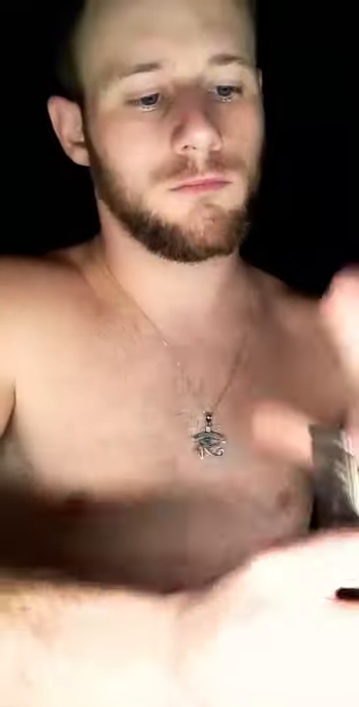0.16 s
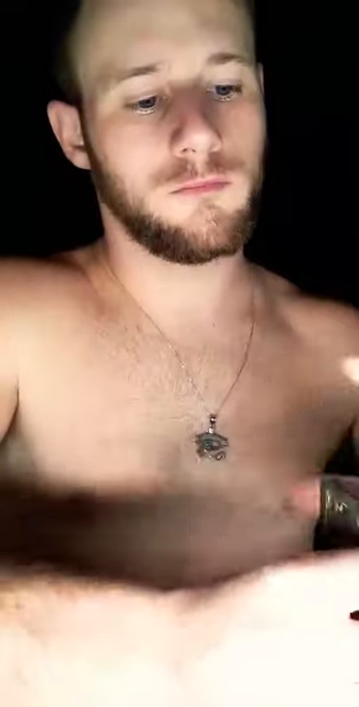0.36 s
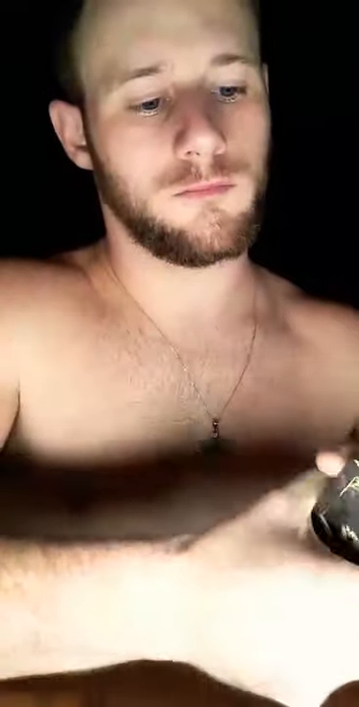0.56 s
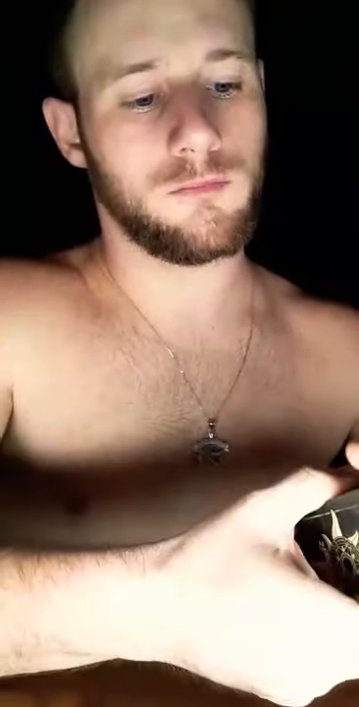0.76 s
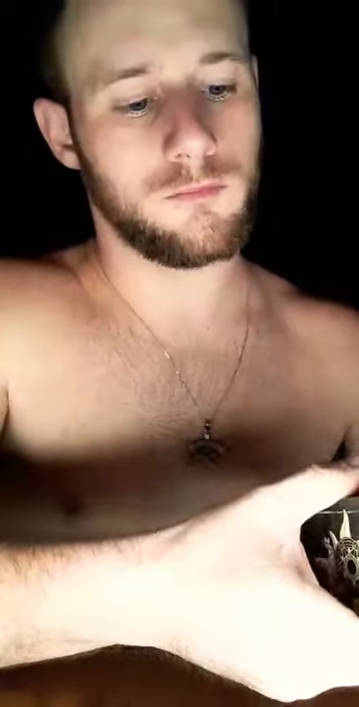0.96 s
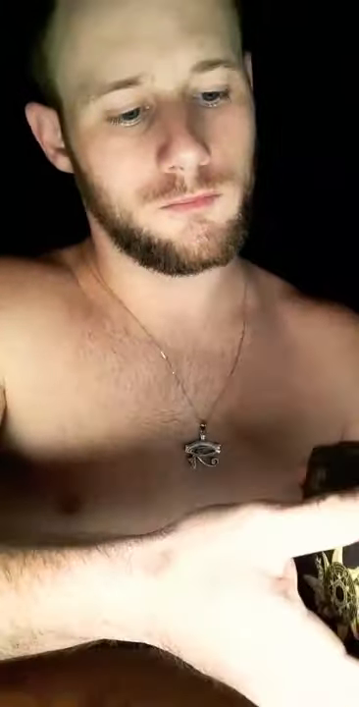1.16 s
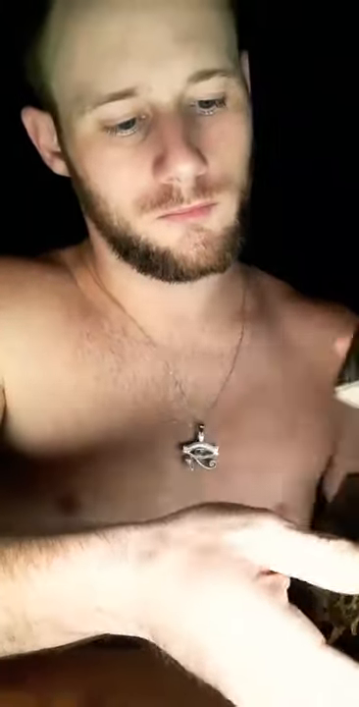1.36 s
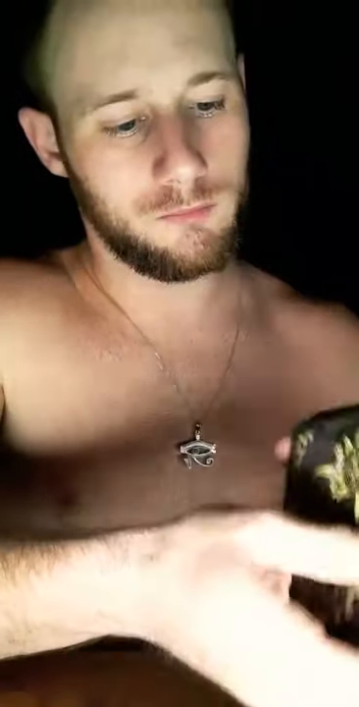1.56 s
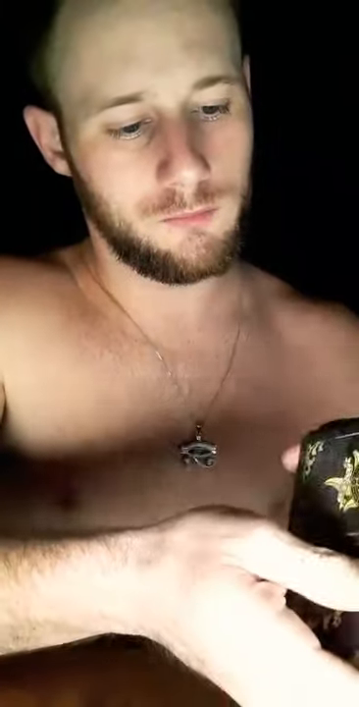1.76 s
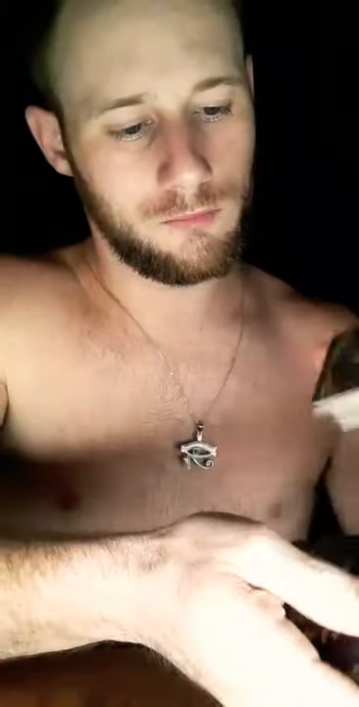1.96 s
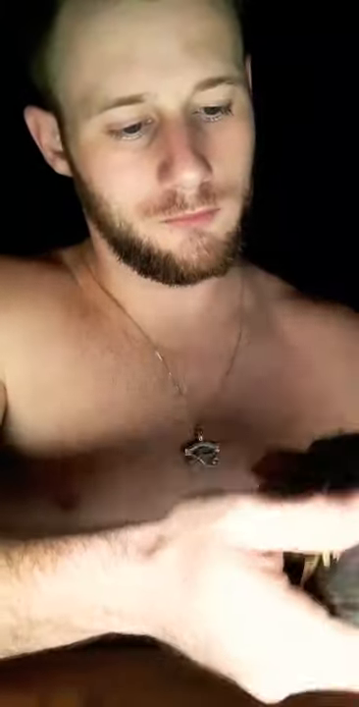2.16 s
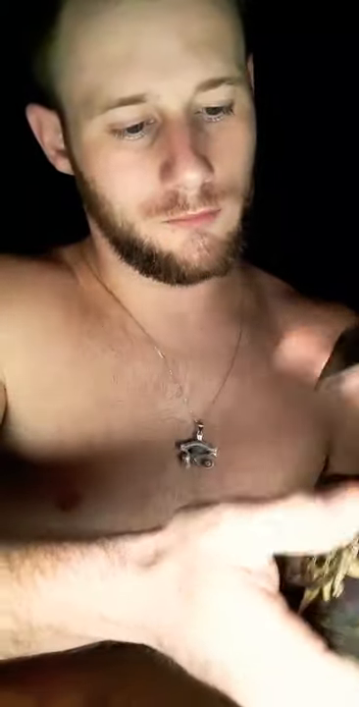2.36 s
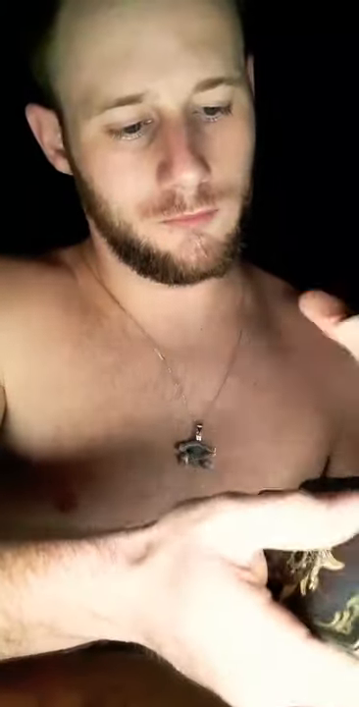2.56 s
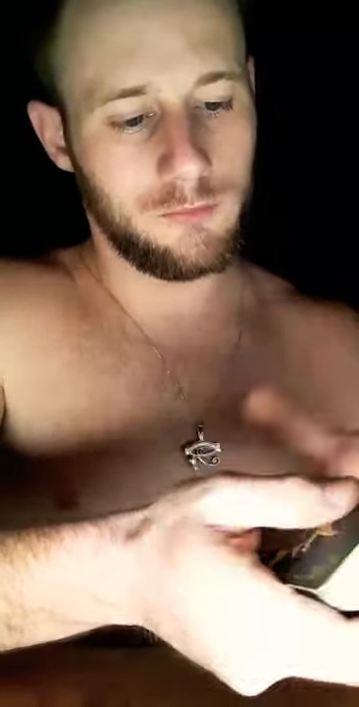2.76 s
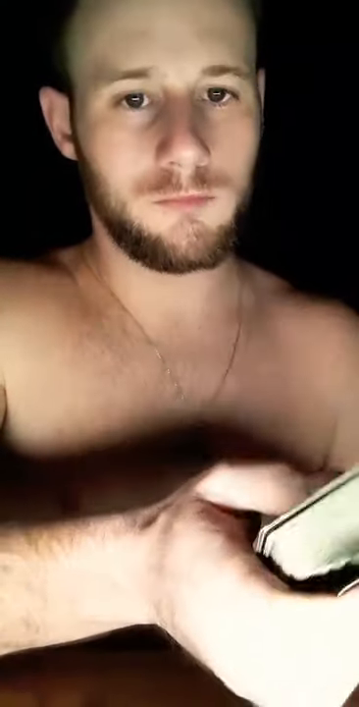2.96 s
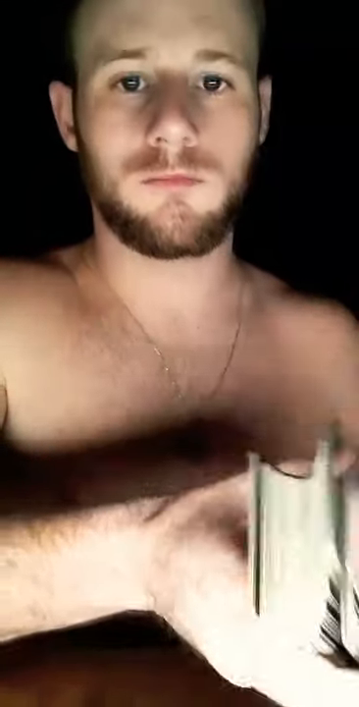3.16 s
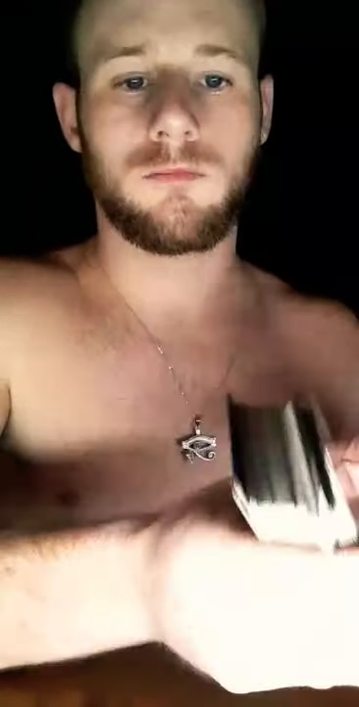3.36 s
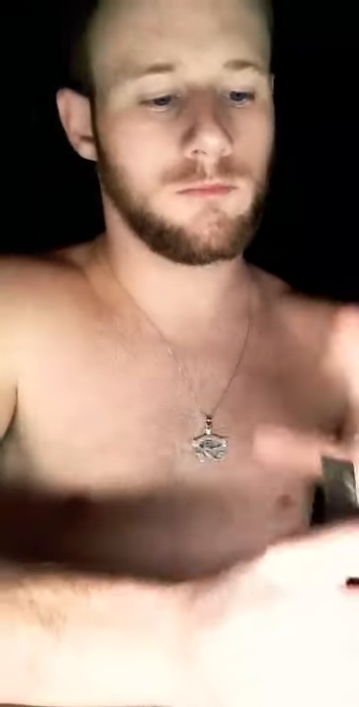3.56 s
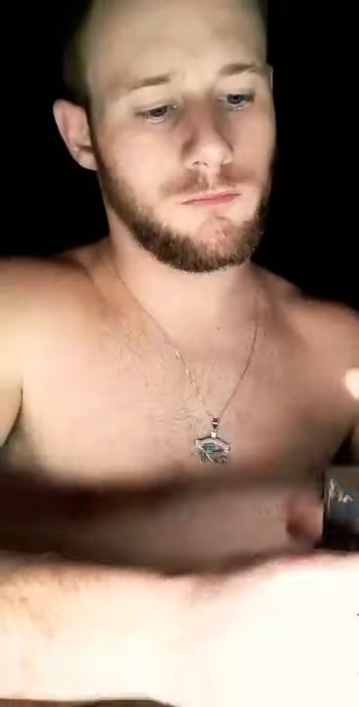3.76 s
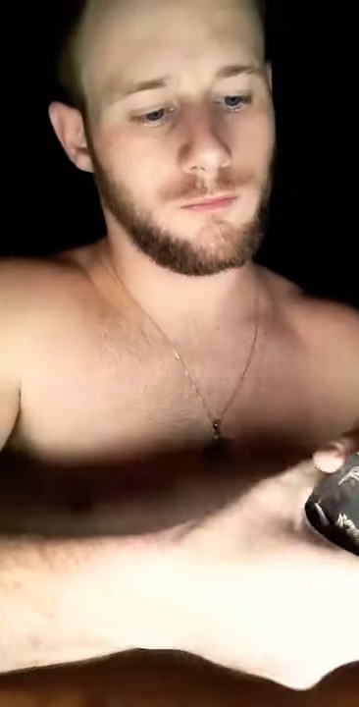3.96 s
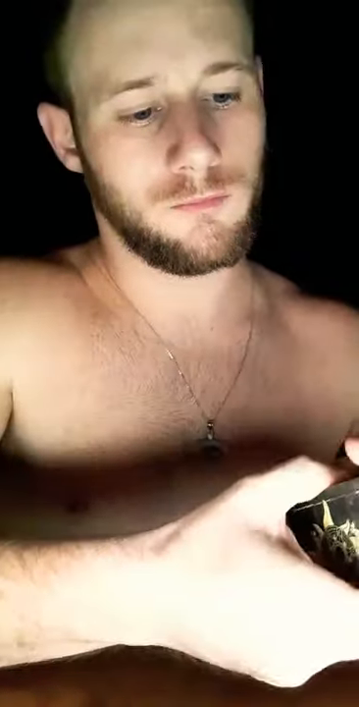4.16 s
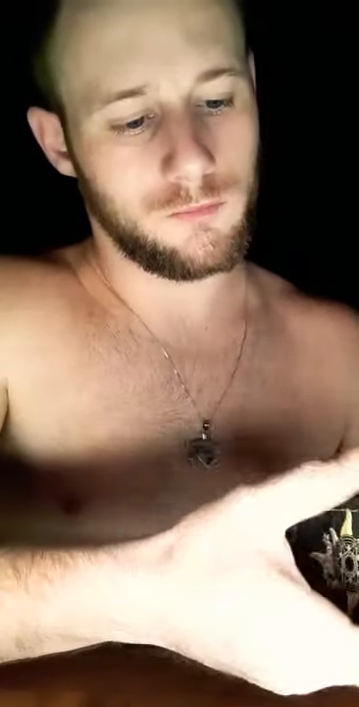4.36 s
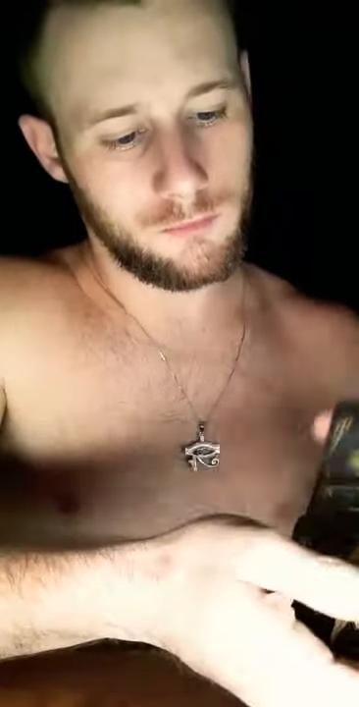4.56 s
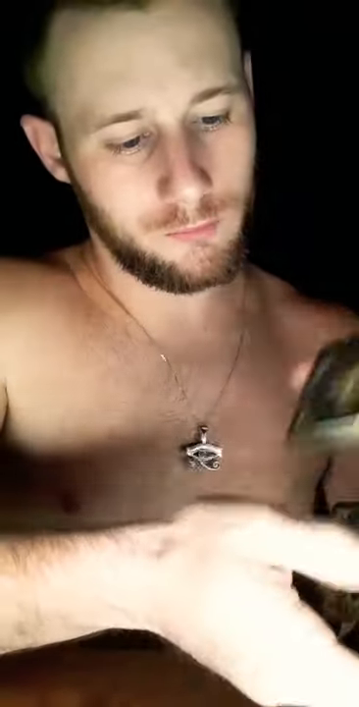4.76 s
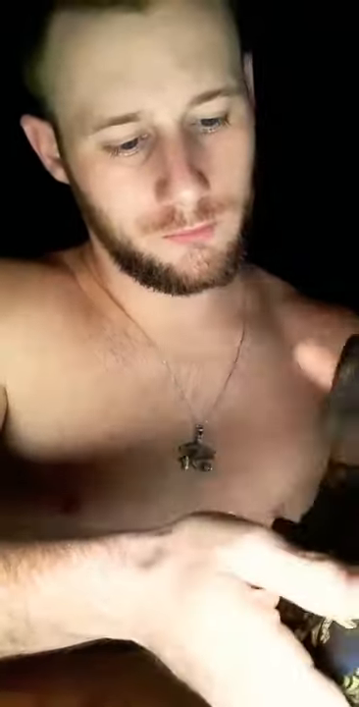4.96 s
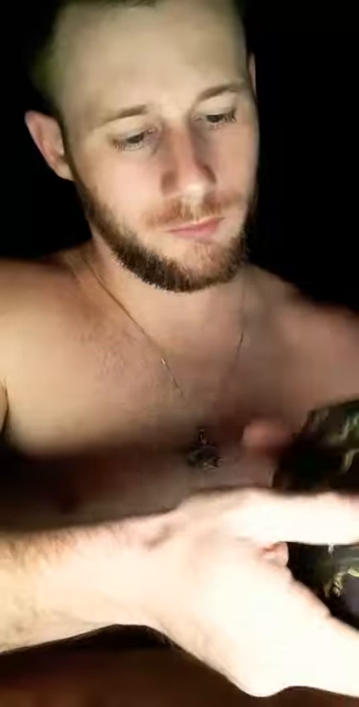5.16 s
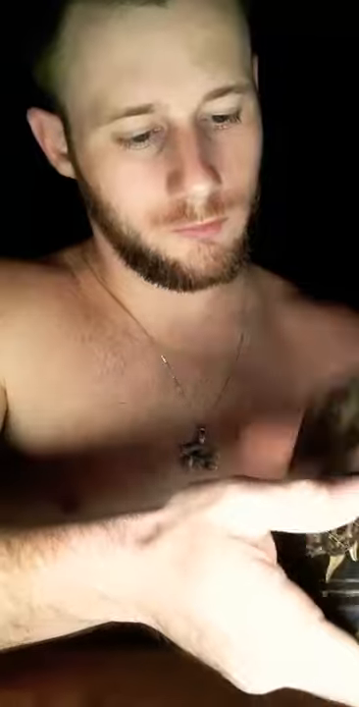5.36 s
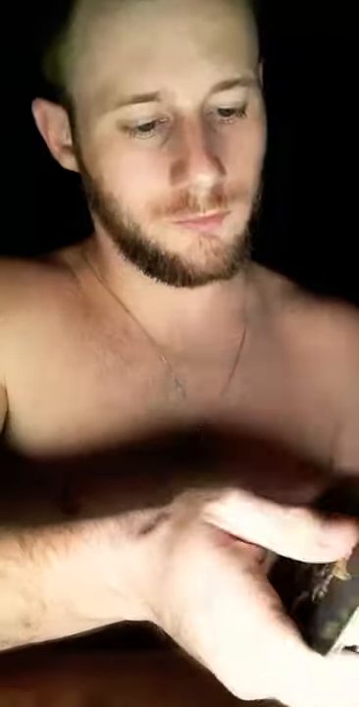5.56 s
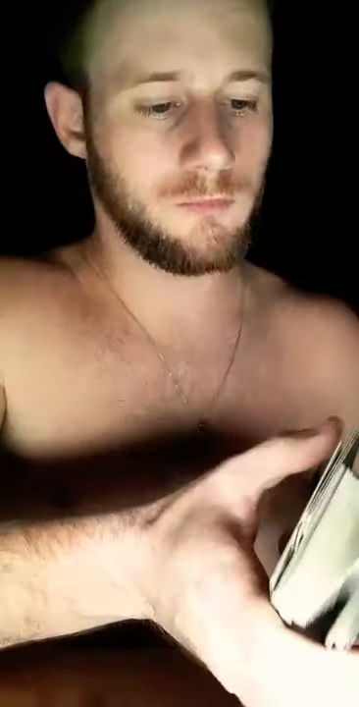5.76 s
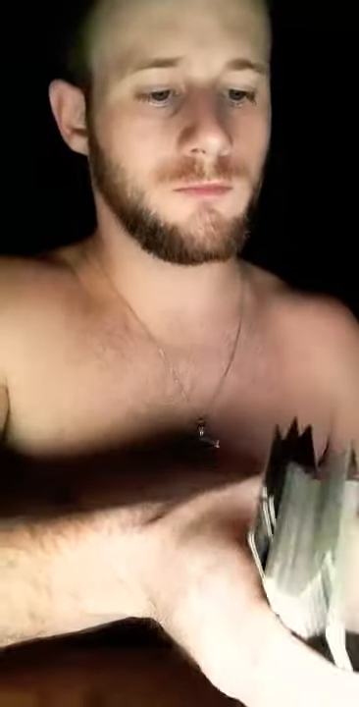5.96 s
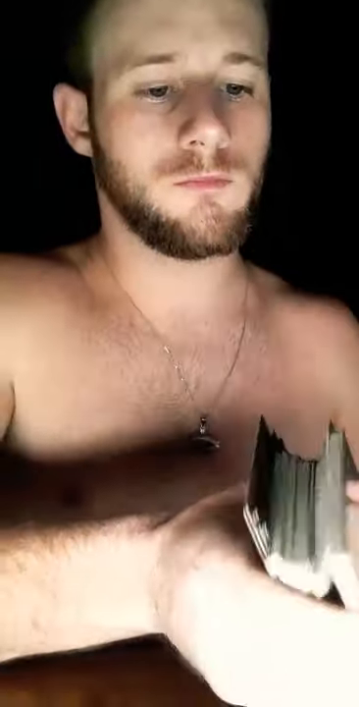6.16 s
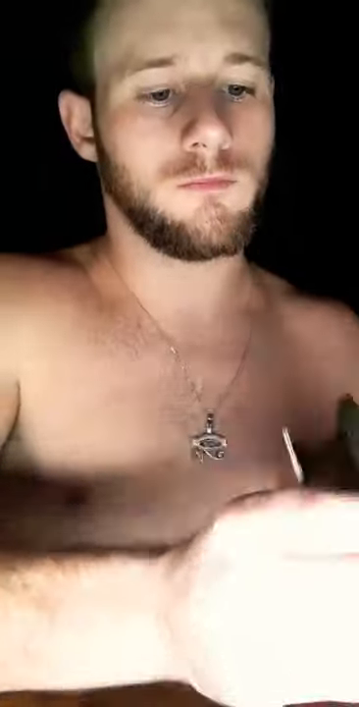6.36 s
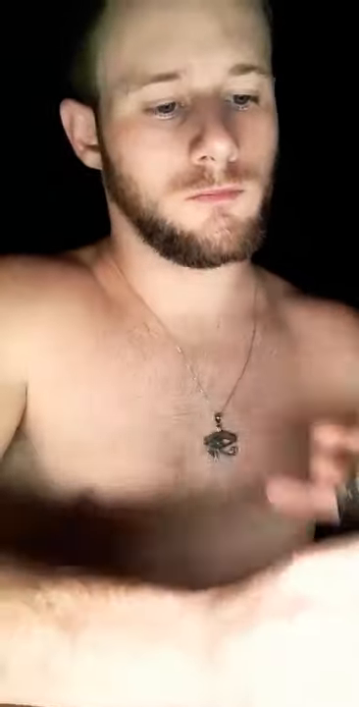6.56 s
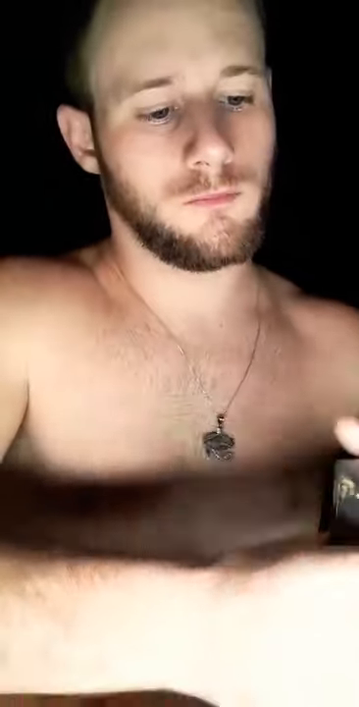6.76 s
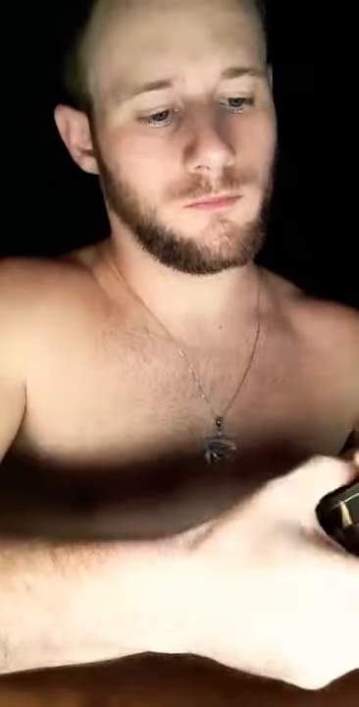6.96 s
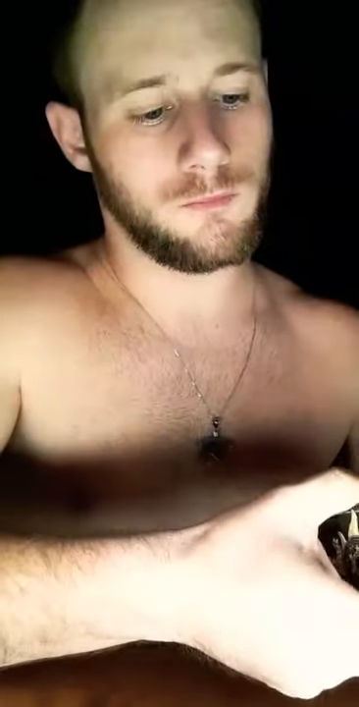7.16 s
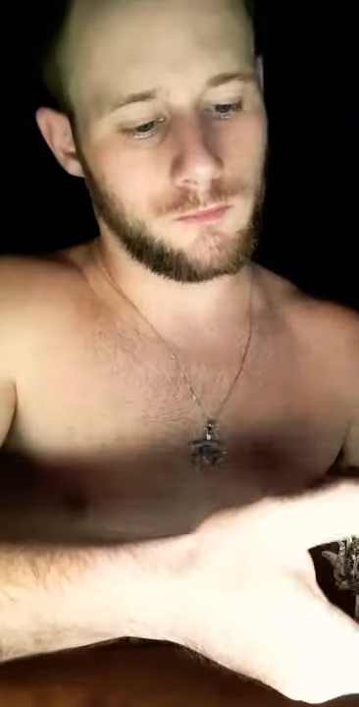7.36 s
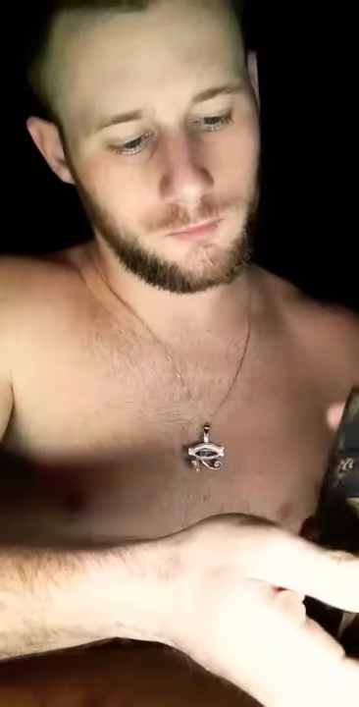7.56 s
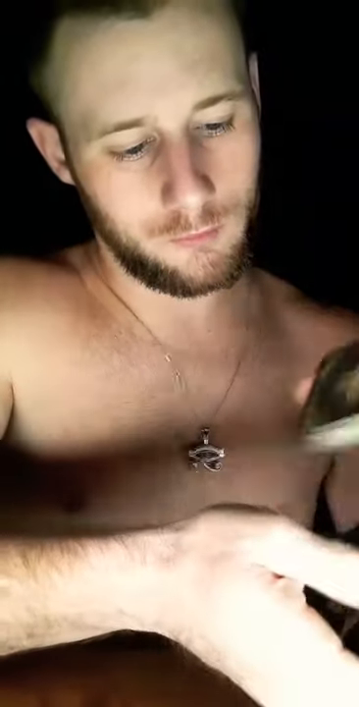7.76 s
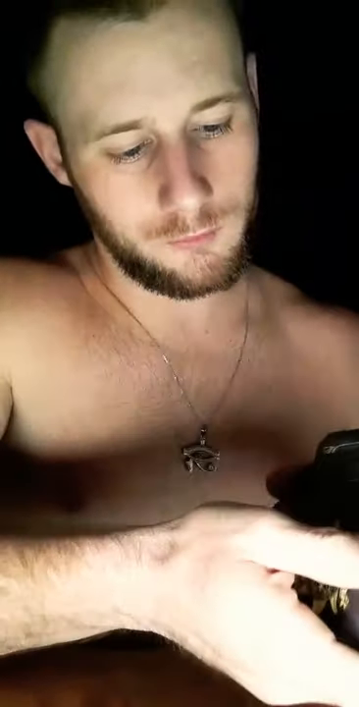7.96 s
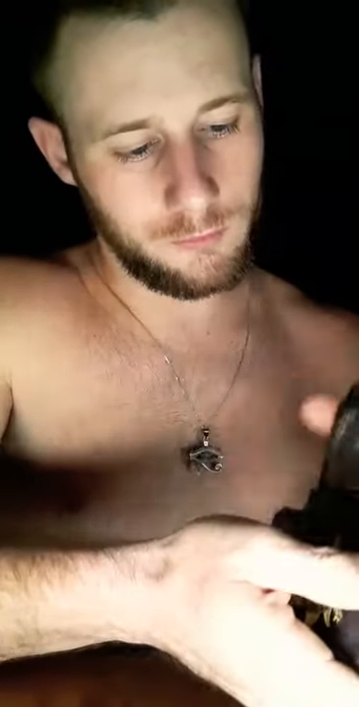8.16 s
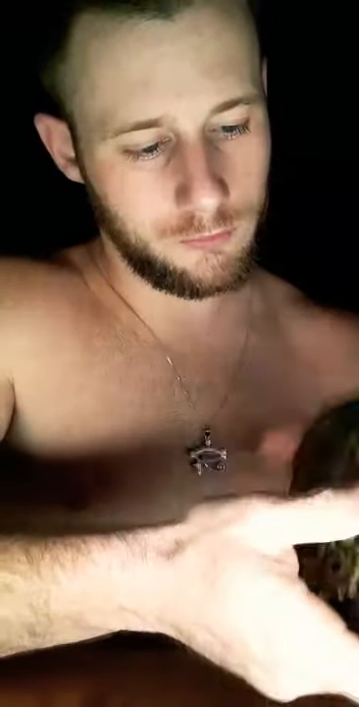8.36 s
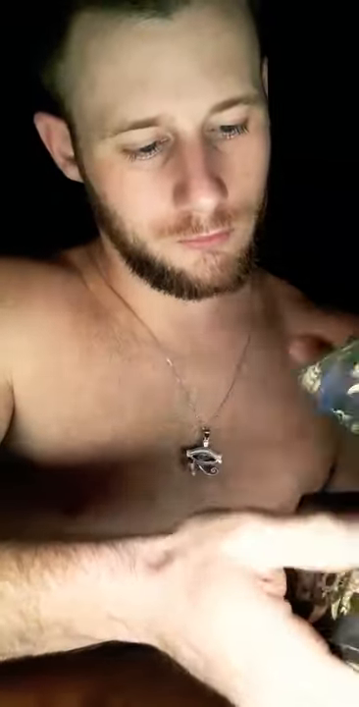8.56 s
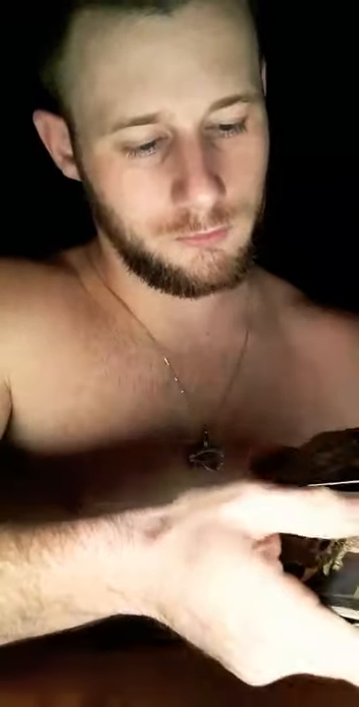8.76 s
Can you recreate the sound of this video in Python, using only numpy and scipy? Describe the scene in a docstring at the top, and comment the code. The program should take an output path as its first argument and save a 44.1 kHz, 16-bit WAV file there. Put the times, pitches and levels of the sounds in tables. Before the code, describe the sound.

A deck of cards knocks on a table, then is shuffled overhand, with packets sliding off in soft hisses and snapping onto the pile. A louder, rattling knock squares the deck with a hollow ring and a low thump. More shuffling leads to a third knock, and then to a last run of slides and snaps. The microphone is close, in a small quiet room with a faint hum.

```python
"""A deck of cards, shuffled overhand close to the microphone.
Packets slide off with a grainy hiss and snap onto the pile; the fingers rub and tick throughout.
Three times the deck is knocked square on the table, whose frame and top ring.
The room is small and quiet, with a faint hum.
Gain control ducks on the loud knocks and creeps back a second later."""
import sys
import numpy as np
from scipy import signal
from scipy.fft import rfft, irfft
from scipy.io import wavfile
from scipy.ndimage import uniform_filter1d, minimum_filter1d

SR = 44100
rng = np.random.default_rng(int(sys.argv[2]) if len(sys.argv) > 2 else 0)


def file_out(sig):
    """Save sig as 16-bit WAV at sys.argv[1]."""
    # one column per channel
    cols = np.atleast_2d(sig).T
    # limit, then scale
    lim = np.clip(cols, -1, 1)
    pcm = np.round(lim * 32767).astype(np.int16)
    wavfile.write(sys.argv[1], SR, pcm)


N = 388521


def amp(db):
    """Decibels to gain."""
    return 10 ** (np.asarray(db) / 20)


def unit_rms(x):
    """Scales to rms 1."""
    return x / np.sqrt(np.mean(x ** 2) + 1e-20)


def interp_log_hz(points, hz):
    """Reads a table on a log-frequency axis."""
    points_hz, values = np.transpose(points)
    return np.interp(np.log(hz + 1), np.log(points_hz), values)


def add(mix, start_s, sound):
    """Mixes a sound in at start_s."""
    part = mix[max(round(start_s * SR), 0):][:len(sound)]
    part += sound[:len(part)]


def colour(x, spectrum, cutoff_hz=None, size=4096):
    """Minimum-phase filter to a spectrum; a soft contact loses what lies above cutoff_hz."""
    hz = abs(np.fft.fftfreq(size, 1 / SR))
    log_gain = np.log(amp(interp_log_hz(spectrum, hz)))
    if cutoff_hz:
        log_gain -= np.log(1 + (hz / cutoff_hz) ** 5) / 2
    response = np.fft.ifft(np.exp(np.conj(signal.hilbert(log_gain)))).real
    return signal.fftconvolve(x, response)[:len(x)]


def wander(rate_hz, count):
    """Smoothed noise, rms 1, changing about rate_hz times a second."""
    return unit_rms(uniform_filter1d(rng.standard_normal(count), max(int(SR / rate_hz), 1)))


def clatter(decay_s, click, flatten, size=4096):
    """One contact: a first click, then the packet's other cards land in quick disorder."""
    t = np.arange(size) / SR
    cards = rng.standard_normal(size) * np.exp(-t / decay_s)
    spectrum = rfft(cards / np.linalg.norm(cards) + click * (t == 0), 2 * size)
    # so many edges meet that no frequency is left out
    return irfft(spectrum / (abs(spectrum) + 1e-9) ** flatten)[:size]


def blow(x, db):
    """Scales a hit to the energy of 3 ms at level db."""
    return amp(db) * x / np.linalg.norm(x) * np.sqrt(.003 * SR)


def modes(table, t, cutoff_hz):
    """Damped modes; a soft blow misses those above cutoff_hz."""
    return sum(amp(db - 60 * t / t60_s) * np.cos(2 * np.pi * hz * t) / (1 + (hz / cutoff_hz) ** 4)
               for hz, db, t60_s in table)


# Room air spectrum [f/Hz, level/dB]
AIR_SPECTRUM = [(20, -40), (45, -19), (76, -12.5), (110, -8), (140, -13.5), (208, -11), (310, -15),
                (570, -21.5), (890, -15.5), (1080, -25), (2380, -28), (4100, -43), (7500, -52),
                (13000, -45.5)]
# Hum tones [f/Hz, level/dB]
HUM_TONES = [(107, -59.5), (231.5, -71.5), (398.4, -71.5), (872, -76), (931, -72.5)]


def air_and_hum(air_db=-56.5, waver_hz=1.3, waver_db=1.0):
    """Low rush of air with a faint wavering hum, as of a distant fan."""
    out = amp(air_db) * unit_rms(colour(rng.standard_normal(N), AIR_SPECTRUM))
    for hz, db in HUM_TONES:
        cycles = np.cumsum(hz + waver_hz * wander(5.2, N)) / SR
        out += np.sqrt(2) * amp(db + waver_db * wander(4.5, N)) * np.sin(2 * np.pi * cycles)
    return out


# Card faces rubbing [f/Hz, level/dB]
RUB_SPECTRUM = [(100, -9), (1000, -5), (3000, -9.5), (5000, -3.5), (7000, -9.5), (9500, -1), (12000, 0.5),
                (14000, 1)]
# Stiff card bending [f/Hz, level/dB]
FLEX_SPECTRUM = [(25, -47.5), (100, -28), (250, -20), (550, -16), (800, -11.5), (1200, -12), (1550, -2.5),
                 (1800, 0.5), (2150, -1), (2600, -14.5), (3100, -10.5), (3900, -20.5), (7000, -25.5),
                 (14000, -52)]
# Card edges clicking [f/Hz, level/dB]
EDGE_SPECTRUM = [(100, -24), (1000, -15), (3000, -13.5), (5000, -1), (6800, -9), (9200, 2), (10500, -3.5),
                 (11800, 4), (14000, -3)]
# Finger effort on the deck [t/s, level/dB]
FINGER_EFFORT = [(0, -80.5), (.95, -81), (1.65, -75.5), (2.5, -77), (3.05, -73), (3.5, -79.5), (4.3, -83),
                 (4.7, -83), (5.75, -75.5), (6.399, -73.5), (7.3, -81), (7.8, -74.5), (8.3, -80),
                 (8.8, -68)]


def fingers(rub_db=2, ring_db=-1, swell_db=4, ticks_per_s=30, tick_db=-3, spread_db=4):
    """Restless fingers rub the deck; the cards ring and their corners tick."""
    effort = amp(np.interp(np.arange(N) / SR, *np.transpose(FINGER_EFFORT)))
    slips = rng.standard_normal((2, N)) * amp(swell_db * wander(7, N))
    rub = amp(rub_db) * unit_rms(colour(slips[0], RUB_SPECTRUM))
    ring = amp(ring_db) * unit_rms(colour(slips[1], FLEX_SPECTRUM))
    onsets = rng.random(N) < ticks_per_s / SR
    impulses = onsets * amp(spread_db * np.minimum(rng.exponential(size=N), 3))
    ticks = amp(tick_db) * unit_rms(colour(impulses, EDGE_SPECTRUM) + colour(impulses, FLEX_SPECTRUM))
    return effort * (rub + ring + ticks)


# Deck edge landing on the table or lightly in the hand [t/s, clack/dB, cutoff/Hz, frame/dB, top/dB]
DECK_KNOCKS = [(0.1839, -26.5, 2400, -33.5, -34), (0.1995, -13.5, 1860, -31, -31.5),
               (0.2130, -10, 4894, -28.5, -23), (0.2147, -19.5, 560, -25, -12),
               (0.2304, -4.5, 6800, -37, -30), (0.2335, 0, 5800, -29.5, -30.5),
               (0.384, -50, 650, -39, -37.5), (1.3135, -43.5, 1030, -68, -50.5),
               (2.6924, -41.5, 1162, -59, -48), (3.5414, -17, 2170, -27.5, -28),
               (3.5460, -9, 2100, -22, -19.5), (3.5632, -11, 2800, -12, -19),
               (3.5750, -2.5, 2870, -15, -22), (3.6037, 4, 8480, -15.5, -17),
               (5.3698, -37, 1020, -56.5, -41), (5.8725, -28, 1700, -27, -24.5),
               (6.4950, -24, 2000, -27.5, -19.5), (6.5030, -5, 1800, -10, -20.5),
               (6.5204, -11, 2298, -19, -23.5), (6.5862, -5, 4600, -29, -32.5),
               (6.601, -16, 2000, -17.5, -22.5), (7.6001, -36.5, 2200, -62, -40.5),
               (8.5598, -32, 1760, -49, -35), (8.6430, -22, 900, -46, -29), (8.6530, -13.5, 4630, -46, -51)]
# Deck-on-table clack [f/Hz, level/dB]
CLACK_SPECTRUM = [(60, -25), (150, -10), (260, -10), (700, -6), (1100, -8.5), (1400, 1), (2100, 1),
                  (2500, 0.5), (2900, -8), (4800, -5.5), (7000, -21.5), (14000, -14.5)]
# Table frame modes, a low boom [f/Hz, level/dB, t60/s]
FRAME_MODES = [(148, -3, 0.011), (176, -3, 0.077), (246, -9, .04)]
# Table top modes, a hollow ring [f/Hz, level/dB, t60/s]
TOP_MODES = [(390, -3, .055), (464, -5.5, 0.025), (634, -10.5, 0.04), (684, -11, 0.068), (884, 1, 0.044),
             (985, -10.5, 0.077)]


def knocks(highpass_hz=112, rise_s=0.003, size=6000):
    """Each landing packet clacks and sets the table's frame and top ringing."""
    out, t = np.zeros(N), np.arange(size) / SR
    rise = 1 - np.exp(-t / rise_s)
    for at_s, clack_db, cutoff_hz, frame_db, top_db in DECK_KNOCKS + rattle_contacts():
        clack = colour(clatter(decay_s=0.0022, click=.6, flatten=0.67), CLACK_SPECTRUM, cutoff_hz)
        add(out, at_s, blow(clack, clack_db))
        add(out, at_s, blow(rise * modes(FRAME_MODES, t, cutoff_hz), frame_db))
        add(out, at_s, blow(rise * modes(TOP_MODES, t, cutoff_hz), top_db))
    # the knocks carry almost nothing below about 110 Hz
    return signal.sosfilt(signal.butter(4, highpass_hz, "high", fs=SR, output="sos"), out)


# Packets rattling down [t/s, length/s, clack/dB, fade/dB, cutoff/Hz, frame re clack/dB]
PACKET_RATTLES = [(0.197, 0.025, -20, 0.5, 3400, -14), (3.567, 0.018, -8.5, 7, 3000, -13),
                  (6.509, .074, -8, 17.5, 1900, -7.5)]


def rattle_contacts(gap_s=.009, jitter=.25, spread_db=2.5, top_db=-11):
    """Knock rows: as the deck is squared, loose packets land at uneven gaps, fading."""
    rows = []
    for start_s, length_s, first_db, fade_db, cutoff_hz, frame_db in PACKET_RATTLES:
        scatter = rng.uniform(-1, 1, (32, 2))
        for after_s, (late, strong) in zip(np.arange(0, length_s, gap_s), scatter):
            at_s = start_s + after_s + jitter * gap_s * late
            db = first_db - fade_db * after_s / length_s + spread_db * strong
            rows.append((at_s, db, cutoff_hz, db + frame_db, db + top_db))
    return rows


# Cards sliding over each other [t/s, length/s, hiss/dB, ring/dB]
CARD_SLIDES = [(.198, .03, -46, -42), (1.139, 0.23, -56, -59.5), (1.648, .2, -66, -58),
               (1.79, .09, -55.5, -53.5), (2.109, .1, -40.5, -49), (2.669, 0.08, -51, -49),
               (2.87, 0.072, -50.5, -54.5), (2.949, 0.047, -53.5, -49.5), (3.057, 0.058, -56.5, -64),
               (3.226, 0.066, -53.5, -61.5), (4.46, 0.15, -50, -60.5), (4.817, 0.14, -40, -60),
               (5.095, 0.071, -45, -48), (5.367, 0.046, -40.5, -41), (5.583, 0.033, -45, -53.5),
               (5.67, .12, -51, -51.5), (5.772, 0.18, -51.5, -51), (6.072, 0.043, -50.5, -52),
               (6.215, 0.097, -59, -64.5), (6.5, 0.091, -49.5, -40), (7.401, .27, -57.5, -65),
               (7.826, 0.14, -42, -36.5), (8.062, 0.14, -56.5, -58.5), (8.379, 0.068, -39.5, -43),
               (8.445, 0.083, -47.5, -57), (8.637, .03, -42, -28.5), (8.758, 0.048, -53, -48)]


def slides(grain_db=3.0, skew=0.65, swell=1.27, pitch_spread=0.11, contrast=0.71):
    """Stick-slip makes a grainy hiss that swells and dies; each grip rings at its own pitch."""
    out = np.zeros(N)
    strokes = CARD_SLIDES + regrip_strokes()
    grips = rng.uniform(-1, 1, len(strokes))
    for (start_s, length_s, hiss_db, ring_db), grip in zip(strokes, grips):
        count = int(length_s * SR)
        speed = np.sin(np.pi * (np.arange(count) / count) ** skew) ** swell
        slips = rng.standard_normal((2, count)) * amp(grain_db * wander(970, count))
        hiss = unit_rms(colour(slips[0], RUB_SPECTRUM, size=512))
        # pressed cards have a flatter resonance than free ones
        pressed_spectrum = np.array(FLEX_SPECTRUM) * [1 + pitch_spread * grip, contrast]
        ring = unit_rms(colour(slips[1], pressed_spectrum))
        add(out, start_s, speed * (amp(hiss_db) * hiss + amp(ring_db) * ring))
    return out


# New grip after each squaring [t/s, first stroke/dB]
FINGER_REGRIPS = [(0.46, -63), (3.82, -61), (6.79, -64)]


def regrip_strokes(count=4, gap_s=0.12, length_s=.15, step_db=2.5):
    """Slide rows: the fingers take a new grip in a few fading strokes."""
    rows = []
    for start_s, first_db in FINGER_REGRIPS:
        for k, late in enumerate(rng.uniform(-.15, .15, count)):
            db = first_db - k * step_db
            rows.append((start_s + (k + late) * gap_s, length_s, db, db))
    return rows


# Packets snapping onto the pile [t/s, click/dB, ring/dB, ring f/Hz]
PACKET_SNAPS = [(1.314, -52.5, -44, 1600), (1.5266, -20.5, -13, 1870), (1.598, -48, -38, 1760),
                (2.113, -36, -29.5, 1730), (2.1428, -34.5, -35, 1860), (2.415, -20, -19.5, 1950),
                (2.6905, -45.5, -44, 1930), (2.958, -59, -39, 1850), (4.8008, -28, -17.5, 1830),
                (4.8320, -33, -31, 1660), (4.9388, -42, -31.5, 1810), (5.7850, -42, -39, 1900),
                (6.0530, -55, -44, 1950), (7.5992, -48, -37, 1798), (7.8217, -24.5, -13.5, 1750),
                (7.893, -29, -31, 1840), (7.9240, -38.5, -28, 1840), (8.1780, -49.5, -44, 1740),
                (8.5599, -33.5, -21.5, 1900), (8.63, -23, -27, 1970), (8.6435, -19, -12.5, 1810),
                (8.6501, -14, -13.5, 1750)]
# Contacts of one snap: leading corner, packet, settling [delay/s, click gain/dB, ring gain/dB]
SNAP_STAGES = [(-.004, -28, -21), (0, -0.5, -0.5), (0.0116, -20, -15)]


def snaps(nominal_hz=1850):
    """Edges click brightly; the bent cards ring near 2 kHz, higher the shorter they are gripped."""
    out = np.zeros(N)
    for at_s, click_db, ring_db, ring_hz in PACKET_SNAPS:
        bent_spectrum = np.array(FLEX_SPECTRUM) * [ring_hz / nominal_hz, 1]
        for delay_s, click_gain_db, ring_gain_db in SNAP_STAGES:
            click = colour(clatter(decay_s=0.0033, click=0.25, flatten=0.68), EDGE_SPECTRUM)
            ring = colour(clatter(decay_s=0.0041, click=0.5, flatten=0.55), bent_spectrum)
            add(out, at_s + delay_s, blow(click, click_db + click_gain_db))
            add(out, at_s + delay_s, blow(ring, ring_db + ring_gain_db))
    return out


def hand_thump(at_s, db, hz, decay_s):
    """The heel of the hand lands with the deck and rocks the table."""
    out, t = np.zeros(N), np.arange(SR // 4) / SR
    add(out, at_s, -amp(db) * np.sin(2 * np.pi * hz * t) * np.exp(-t / decay_s))
    return out


# Room decay [f/Hz, t60/s]
ROOM_DECAY = [(100, 0.43), (260, .24), (700, .24), (1900, 0.19), (4800, 0.19), (13000, .165)]


def room(x, onset_s, echo_s, echo_gain, size=22050, drift_hz=.23, late_db=-24, late_t60_s=.38):
    """Dense reflections that die faster in the treble, a faint late tail and one early echo."""
    taps = rng.standard_normal((2, size)) * (np.arange(size) > onset_s * SR)
    hz, t, spectra = signal.stft(taps, SR, nperseg=256)
    main_decay = amp(-60 * t / interp_log_hz(ROOM_DECAY, hz)[:, None])
    late_decay = amp(late_db - 60 * t / late_t60_s)
    tails = signal.istft(spectra * np.hypot(main_decay, late_decay), SR, nperseg=256)[1]
    # reflections shift as the hands move: crossfade two tails
    angle = 2 * np.pi * drift_hz * np.arange(N) / SR
    out = sum(signal.fftconvolve(x * share, tail / np.linalg.norm(tail))[:N]
              for share, tail in zip((np.cos(angle), np.sin(angle)), tails))
    add(out, echo_s, echo_gain * x)
    return out


# Part of a knock that leaves through the air [f/Hz, gain/dB]
AIRBORNE_SPECTRUM = [(150, -3), (500, -1.5), (2000, 0), (3000, 1), (4800, -6), (6500, 0.5), (9500, 4.5),
                     (14000, 0.5)]


def scene():
    """The table is right at the microphone; the hands are farther off and carry more room."""
    table = knocks()
    cards = snaps() + slides() + fingers()
    table_room = room(colour(table, AIRBORNE_SPECTRUM), onset_s=.005, echo_s=0.015, echo_gain=.15)
    cards_room = room(cards, onset_s=.003, echo_s=.0098, echo_gain=.45)
    direct = table + amp(-2.5) * cards + hand_thump(at_s=3.604, db=-6, hz=58, decay_s=0.015)
    reflected = amp(-8.0) * table_room + amp(-4.5) * cards_room
    return (direct + reflected + air_and_hum())[None]


def gain_control(x, threshold_db=-10, max_duck_db=8, hold_s=1.0, recover_db_per_s=9):
    """Ducks at once, holds, then recovers slowly."""
    power_db = 10 * np.log10(abs(uniform_filter1d(x ** 2, size=100)) + 1e-12)
    over_db = np.clip(power_db - threshold_db, 0, max_duck_db)
    half_hold = int(hold_s * SR / 2)
    held_db = -minimum_filter1d(-over_db, 2 * half_hold + 1, origin=half_hold, mode="constant")
    recovery_db = np.arange(N) * recover_db_per_s / SR
    duck_db = np.maximum.accumulate(held_db + recovery_db) - recovery_db
    return x * amp(-uniform_filter1d(duck_db, size=80))


def limiter(x, ceiling=.7, size=64):
    """Look-ahead limiter: holds the loudest cracks down without buzzing."""
    allowed_gain = ceiling / np.maximum(abs(x), ceiling)
    return x * uniform_filter1d(minimum_filter1d(allowed_gain, size), size)


def record(dry, cutoff_hz=14150):
    """Gain control, peak limiter, low-pass."""
    limited = limiter(gain_control(dry[0]))
    lowpass = signal.firwin(255, cutoff_hz, window=("kaiser", 8), fs=SR)
    return signal.oaconvolve(limited, lowpass, "same")[None]


dry = scene()
out = record(dry)
file_out(out)
```